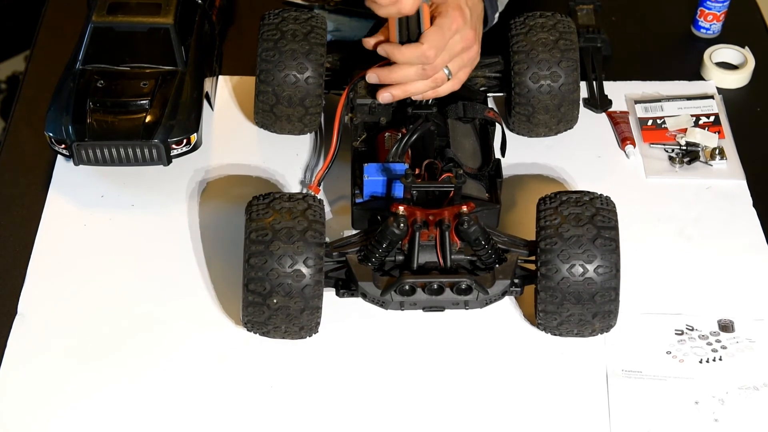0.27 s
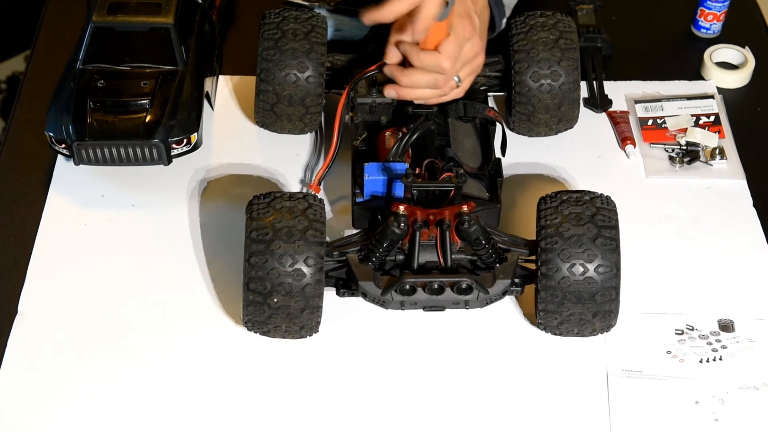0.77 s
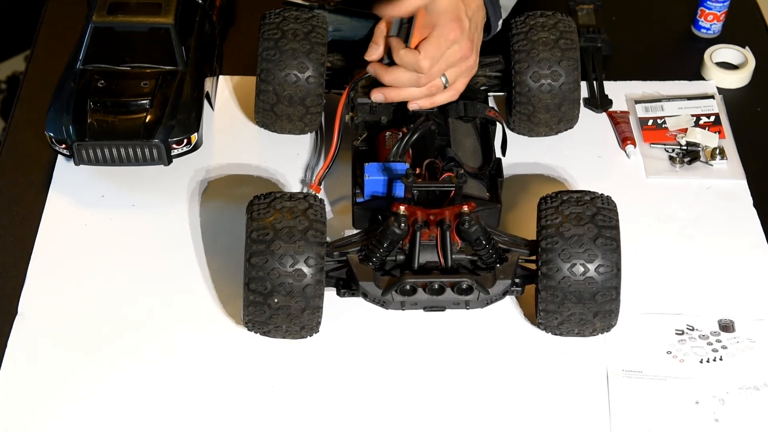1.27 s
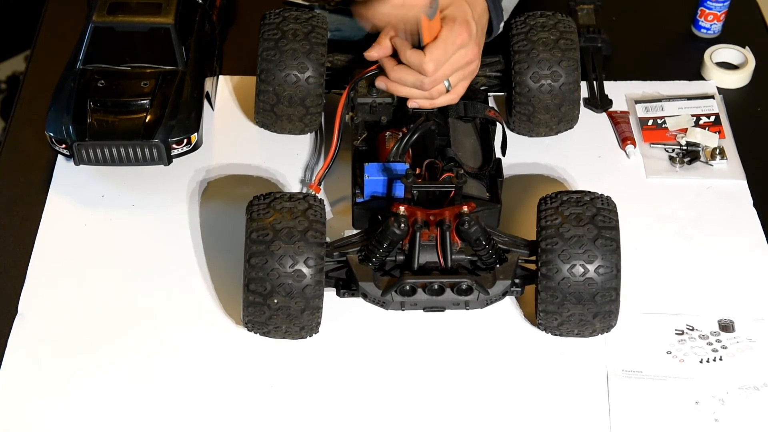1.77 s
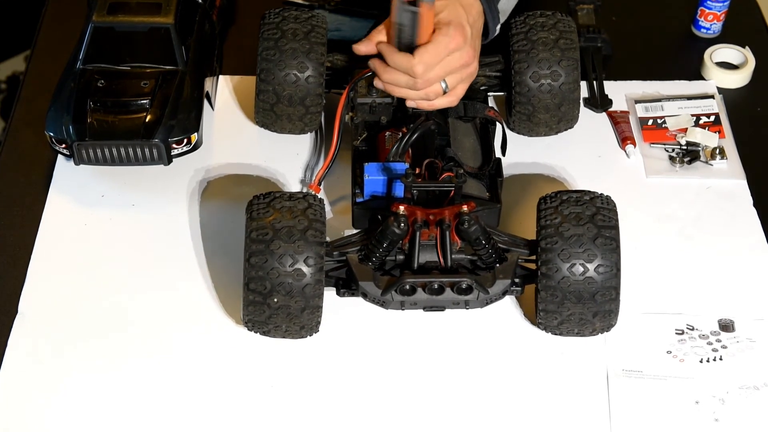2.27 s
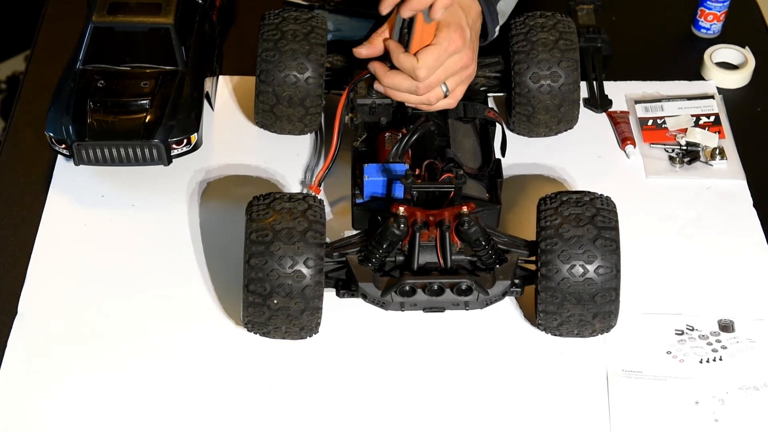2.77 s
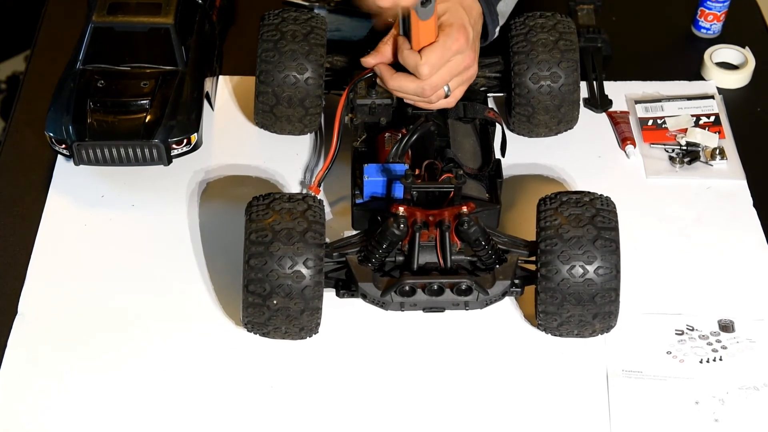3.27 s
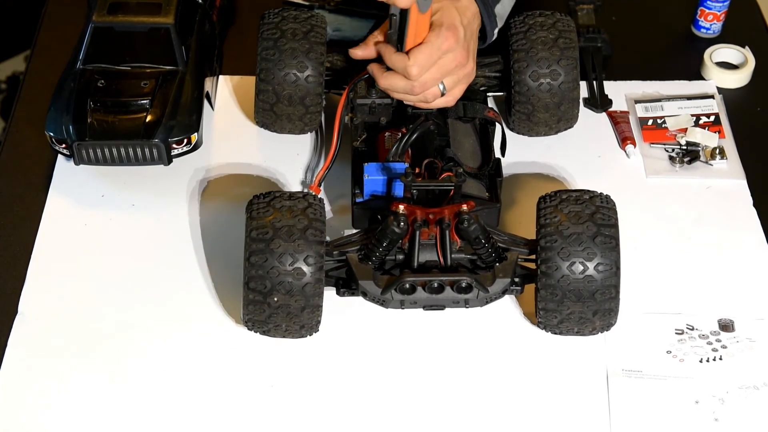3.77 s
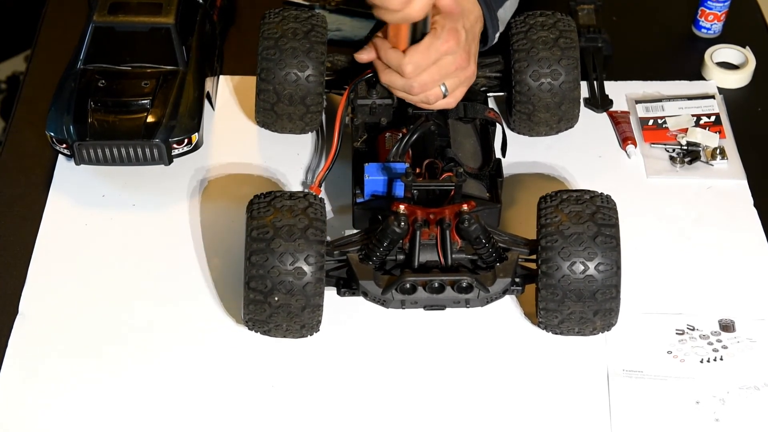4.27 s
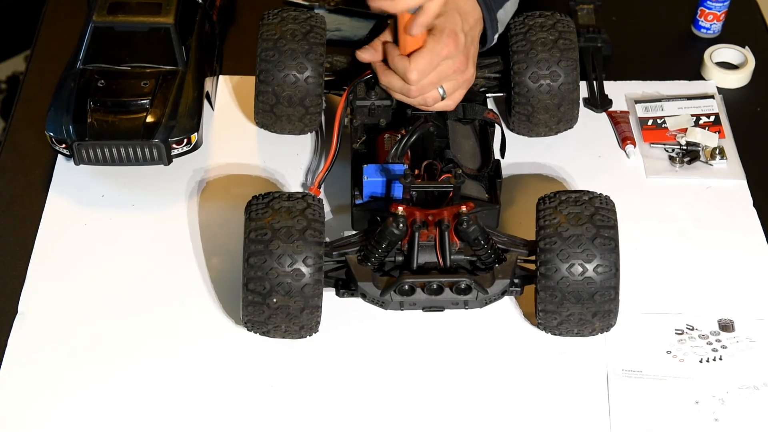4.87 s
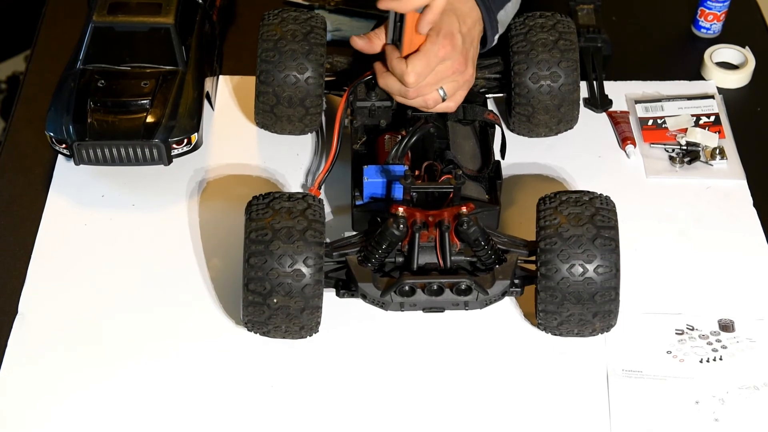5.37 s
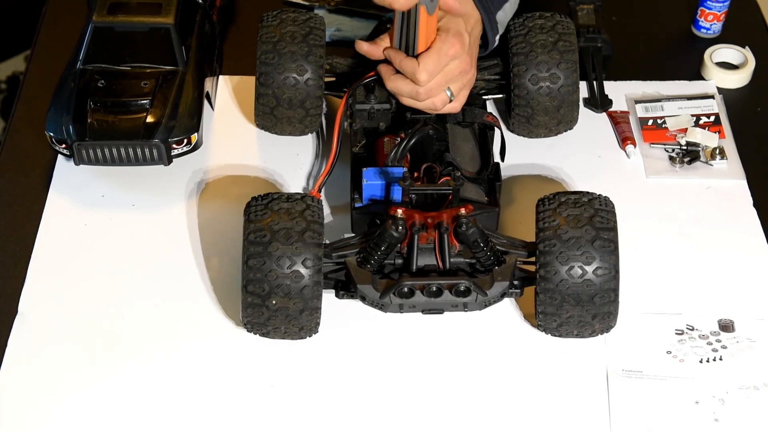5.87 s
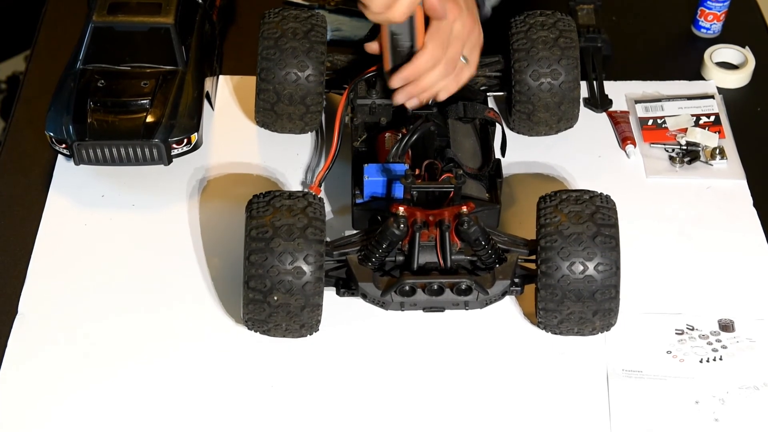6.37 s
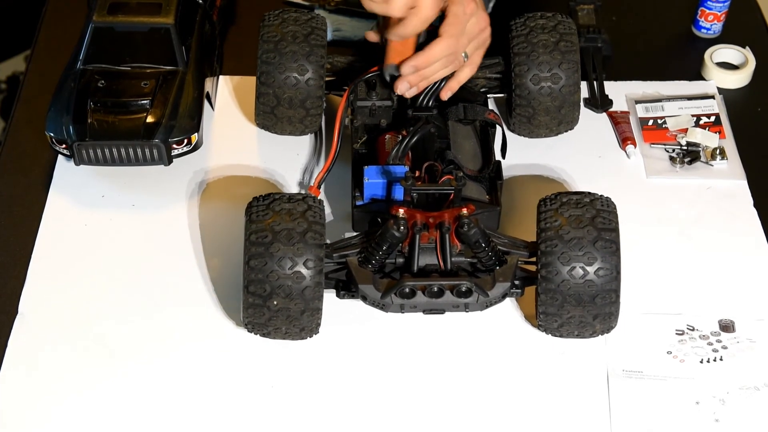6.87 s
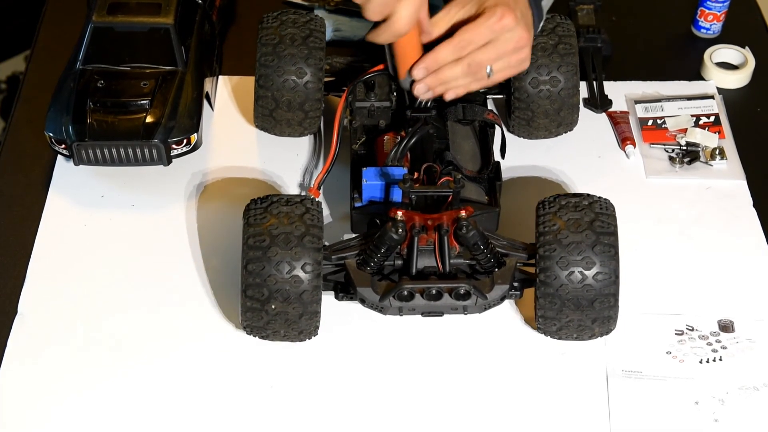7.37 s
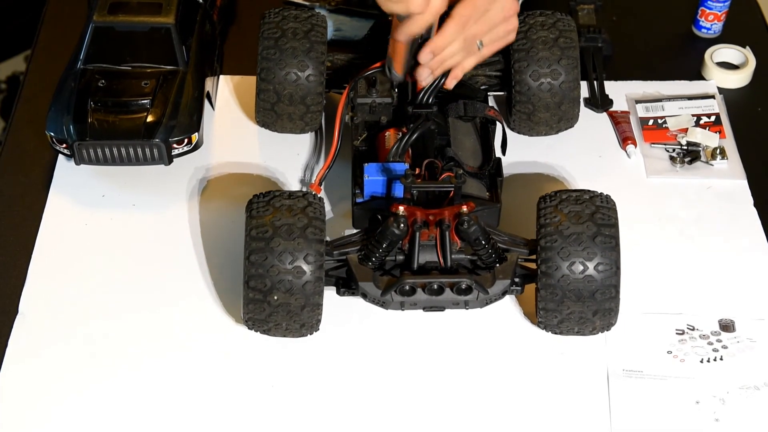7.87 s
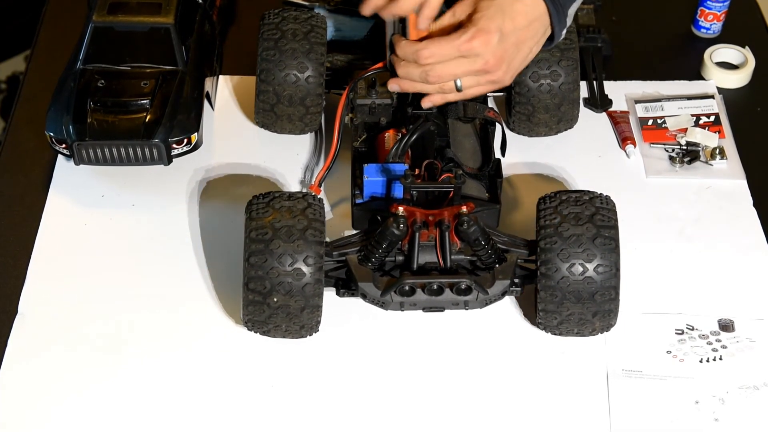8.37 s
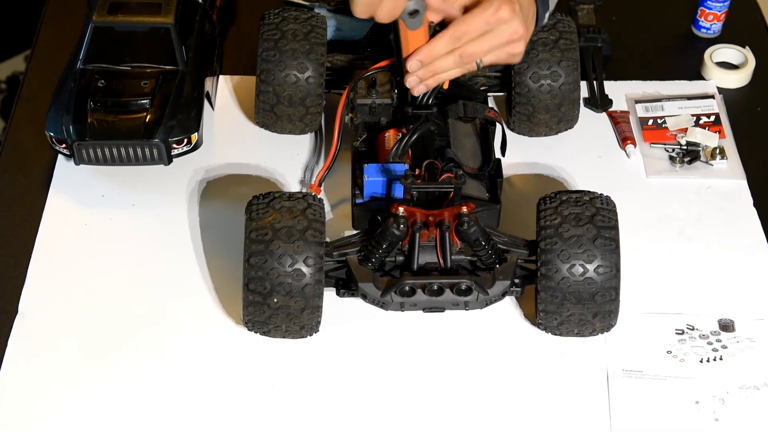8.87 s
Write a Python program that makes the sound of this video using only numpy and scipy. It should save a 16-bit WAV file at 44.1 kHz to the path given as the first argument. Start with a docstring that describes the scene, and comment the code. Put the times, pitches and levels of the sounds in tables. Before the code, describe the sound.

Close, dry snaps of a small tool against a hollow plastic chassis, with faint finger rubs and tiny creaks over soft room hiss.

```python
"""A quiet room, close to a table: hands turn a small tool in the plastic chassis of a model car.
Each blow makes the tool click and the chassis knock hollowly, by ringing damped resonances.
Fingers rub over the grip as coloured friction noise; tight parts creak as slips feed a narrow resonance.
Table and walls answer as early echoes and a diffuse tail, over room tone and faint microphone hiss.
A short low thump, one decaying push, lies under the snap at 7.2 s; a limiter holds the hardest snaps."""
import sys
import numpy as np
from scipy import signal
from scipy.fft import rfft, irfft, next_fast_len
from scipy.io import wavfile
from scipy.ndimage import uniform_filter1d, minimum_filter1d

SR = 44100
rng = np.random.default_rng(int(sys.argv[2]) if len(sys.argv) > 2 else 0)


def store_wav(level_fs):
    """Save 16-bit WAV to argv[1]."""
    pcm = np.round(np.clip(np.atleast_2d(level_fs), -1, 1) * 32767)
    wavfile.write(sys.argv[1], SR, pcm.T.astype(np.int16))


N = 402633

# strokes of the fingers over the grip: [middle t/s, half length/s, level/dB before the rub mix]
STROKES = [(0, 0.034, -56.5), (0.226, 0.032, -43), (0.523, 0.12, -54.5), (1.039, 0.035, -48),
           (1.579, 0.054, -53), (2.137, 0.025, -51), (2.284, 0.031, -49), (2.953, 0.051, -50.5),
           (3.116, 0.042, -49), (3.658, 0.059, -48), (4.195, 0.078, -52), (4.41, 0.045, -54.5),
           (4.625, 0.041, -51), (4.788, 0.044, -56), (5.086, 0.069, -48), (5.53, 0.067, -56),
           (5.731, 0.063, -53), (6.019, 0.017, -46), (6.326, 0.12, -56.5), (7.098, 0.098, -57),
           (7.588, 0.042, -54), (7.82, 0.077, -56.5), (8.539, 0.038, -53), (8.742, 0.049, -55)]
# resonances of the tool, the main one first: [f/Hz, width/Hz of one filter pass, relative level/dB]
TOOL_MODES = [(3466, 965, 11.5), (2646, 110, -5.5), (4174, 520, -5)]


def undb(db):
    """Decibels to gain."""
    return 10 ** (np.asarray(db) / 20)


def unit(x):
    """Scale to rms 1."""
    return x / np.sqrt(np.mean(x ** 2))


def along(points, hz):
    """Read (Hz, value) points on a log-frequency axis."""
    f, value = np.transpose(points)
    return np.interp(np.log(np.maximum(hz, 1)), np.log(f), value)


def colour(x, points):
    """Filter by a (Hz, dB) spectrum."""
    size = next_fast_len(len(x))
    gain = undb(along(points, np.fft.rfftfreq(size, 1 / SR)))
    return irfft(rfft(x, size) * gain, size)[:len(x)]


def add(track, s, sound):
    """Mix a sound into the track at time s."""
    i = max(int(s * SR), 0)
    part = sound[:max(len(track) - i, 0)]
    track[i:i + len(part)] += part


def stereo(mid, side):
    """Left and right from mid and side."""
    return np.array([mid + side, mid - side])


def quiet(db=-57.0):
    """Steady room tone and microphone hiss: coloured noise, narrow in the bass and wide in the treble."""
    # spectrum of room tone and hiss: [f/Hz, relative level/dB per Hz]
    tone_points = [(20, 3), (45, -7), (80, -2), (130, 1.5), (300, 2), (550, -.5), (1000, -5), (2000, -8),
                   (3500, -7.5), (5000, -10), (8000, -12), (12000, -12.5)]
    # stereo width: [f/Hz, side minus mid level/dB]
    width_points = [(25, -21), (70, -6.5), (150, -4.5), (400, -3), (1500, -1.5), (8000, -1), (16000, 0.5)]
    mid = unit(colour(rng.standard_normal(N), tone_points))
    side = unit(colour(rng.standard_normal(N), tone_points))
    return undb(db) * stereo(mid, colour(side, width_points))


def room(push, t60, tail_db, side_db, build_s=0.001464, size=14000):
    """A short push as it arrives: direct, off near surfaces, then as a diffuse tail that builds and decays."""
    # first reflections from table and walls: [delay t/s, level/dB re direct]
    reflections = [(.0019, -19.5), (.0046, -10.5), (.0071, -10.5), (0.0101, -14), (0.0152, -17)]
    t = np.arange(size) / SR
    fade = undb(-60 * t / t60) * (1 - np.exp(-(t / build_s) ** 2))
    tail = undb(tail_db) * rng.standard_normal((2, size)) * fade / np.linalg.norm(fade)
    mid, side = tail
    early = np.zeros(size)
    add(early, 0, push)
    for delay_s, db in reflections:
        moved = rng.uniform(.92, 1.08)  # the paths shift as the hands move
        add(early, delay_s * moved, undb(db) * push)
    return stereo(early + mid, undb(side_db) * side)


def contact(chatter_db, settle_s, size=2048):
    """One sharp blow, then tiny uneven contacts as the parts settle; energy 1."""
    t = np.arange(size) / SR
    chatter = unit(rng.standard_normal(size) ** 3)  # cubing makes it uneven
    push = undb(chatter_db) * chatter * np.exp(-t / settle_s)
    push[0] += 1
    return push / np.linalg.norm(push)


def ring(push, modes, main_hz=None, others_db=0):
    """A push through heavily damped resonances that swell, then decay; rms 1 over the first 4 ms."""
    shift = main_hz / modes[0][0] if main_hz else 1
    out = 0
    for k, (hz, width_hz, db) in enumerate(modes):
        hz = hz * shift
        b, a = signal.iirpeak(hz, hz / min(width_hz, SR / 5), fs=SR)  # width capped at SR / 5
        mode = signal.sosfilt([np.r_[b, a]] * 2, push)  # two passes give the swell
        out = out + undb(db + others_db * (k > 0)) * mode
    return out / np.sqrt(np.mean(out[:, :int(.004 * SR)] ** 2))


def thump(s=7.2065, db=-24, decay_s=0.00051, size=1024):
    """A short dull low thump under the snap at 7.2 s: one push that decays exponentially."""
    out = np.zeros(N)
    add(out, s, undb(db) * np.exp(-np.arange(size) / SR / decay_s))
    return out


def friction(grains_per_s, spread_db, catch_db, catch_s):
    """Countless tiny catches of uneven size over a smooth hiss; the finger sticks and slips in short spurts."""
    sizes = undb(spread_db * np.minimum(rng.exponential(size=N), 3))
    sizes = sizes * rng.choice([-1, 1], N)
    caught = rng.random(N) < grains_per_s / SR
    grains = unit(sizes * caught) + rng.standard_normal(N)
    spurts = unit(uniform_filter1d(rng.standard_normal(N), int(catch_s * SR)))
    return grains * undb(catch_db * spurts)


def rubs(rub_db=-2, skin_db=-14.5, shuffle_db=-66):
    """Each finger stroke swells and fades as scraping and skin hiss; between strokes the hands still shuffle."""
    # spectrum of the scraping: [f/Hz, relative level/dB per Hz]
    scrape_points = [(300, -21), (800, -12), (1450, -6.5), (2200, -9.5), (2800, -6.5), (3500, -1.5),
                     (4300, -8), (5200, -13.5), (7200, -18), (9500, -28), (16000, -46.5)]
    # spectrum of the skin's hiss: [f/Hz, relative level/dB per Hz]
    skin_points = [(500, -17), (1500, -4), (5000, -8.5), (7500, -0.5), (10000, -4.5), (14000, -7)]
    t = np.arange(N) / SR
    grip = np.full(N, undb(shuffle_db))
    for s, half_s, db in STROKES:
        grip += undb(db) * np.exp(-.5 * ((t - s) / half_s) ** 2)
    scrape = friction(grains_per_s=1800, spread_db=4.5, catch_db=3.5, catch_s=.008)
    scrape = undb(rub_db) * unit(colour(scrape, scrape_points))
    skin = undb(skin_db) * unit(colour(rng.standard_normal(N), skin_points))
    return grip * (scrape + skin)


def creaks(slip_s=0.0063, swell_s=0.00078, size=12000):
    """Tight parts creak: a short run of slips feeds one narrow resonance."""
    # creaks: [t/s, f/Hz, rms level/dB over the first 20 ms before the room, t60/s]
    creak_rows = [(1.718, 1000, -53, 0.018), (2.3, 1810, -46.5, .015), (5.1, 1148, -40.5, 0.046),
                  (5.234, 3000, -47, 0.062), (5.607, 1170, -50, 0.037)]
    out, t = np.zeros(N), np.arange(size) / SR
    for s, hz, db, t60 in creak_rows:
        mode = np.sin(2 * np.pi * hz * t) * undb(-60 * t / t60) * (1 - np.exp(-t / swell_s))
        slips = contact(chatter_db=-12.0, settle_s=slip_s)
        tone = signal.fftconvolve(slips, mode)[:size]
        add(out, s, undb(db) * tone / np.sqrt(np.mean(tone[:SR // 50] ** 2)))
    return out


def stray_clicks(odds_per_s=6.2, over_rub_db=2.5, spread_db=1.5, upper_re_rub_db=-7.5):
    """Loose parts tick faintly, at most once a stroke and likelier in long ones; rows like those of the clicks."""
    rows = []
    draws = rng.uniform(-1.1, 1, (len(STROKES), 4))
    for (s, half_s, rub_db), (chance, when, tool, chassis) in zip(STROKES, draws):
        if abs(chance) < odds_per_s * 2 * half_s:
            db = rub_db + over_rub_db
            rows.append((s + when * half_s, TOOL_MODES[0][0], db + spread_db * tool,
                         db + spread_db * chassis, db + upper_re_rub_db))
    return rows


def touch(tool_db, chassis_db, upper_db):
    """Pitch of the chassis and level of the tick, from how hard and where the blow lands."""
    hollowness_db = chassis_db - tool_db
    snap_db = max(tool_db + 13, 0)  # a hard snap is one above -13 dB
    # a knock that goes mostly into the chassis sounds deeper: 31 Hz per dB beyond 3 dB
    chassis_hz = 1540 - 31 * max(hollowness_db - 3, 0)
    # the tick follows the upper ring; a glancing touch has less of it, a hard snap more
    tick_db = upper_db - 3.5 + 0.75 * min(hollowness_db, 0) + .45 * snap_db
    return chassis_hz, tick_db


def clicks(give_hz=6000):
    """Every blow rings tool and chassis, pitched by how they are gripped, with an upper ring and a bare tick."""
    # clicks of the tool on the chassis, rms levels over the first 4 ms:
    # [t/s, tool f/Hz, tool level/dB, chassis level/dB, upper ring level/dB]
    click_rows = [(0.2011, 3640, -36.5, -40, -44), (0.2195, 3430, -14, -36, -38),
                  (0.2298, 3490, -18.5, -23, -38.5), (.441, 3260, -31.5, -41.5, -72),
                  (.534, 3480, -33, -39, -63), (0.546, 3450, -47.5, -42.5, -55),
                  (.8369, 3250, -41.5, -45.5, -61), (1.0522, 4180, -34.5, -36, -40.5),
                  (1.3378, 3520, -15.5, -19.5, -29.5), (1.577, 4460, -49.5, -42, -46.5),
                  (1.629, 3460, -26, -43, -43.5), (1.7572, 3800, -44, -44.5, -52),
                  (1.8224, 3350, -47.5, -48, -60), (1.9173, 3390, -10, -37, -28.5),
                  (2.3025, 3830, -41, -43.5, -51), (2.6442, 3300, -39, -52, -63),
                  (2.7153, 3600, -44.5, -43, -55.5), (3.159, 4470, -37, -45, -47.5),
                  (3.4721, 3470, -17.5, -40.5, -34.5), (3.633, 3980, -25.5, -39, -42.5),
                  (3.7448, 3130, -43, -45, -72), (3.8671, 3400, -43.5, -45, -61),
                  (4.2394, 3660, -40.5, -37, -48), (4.313, 3570, -44.5, -38.5, -50),
                  (4.3641, 3530, -19.5, -44, -39.5), (4.408, 3440, -32, -52, -61),
                  (4.4284, 3590, -38, -36, -51), (4.5823, 3250, -50.5, -42, -65),
                  (4.6944, 3550, -45, -41, -61), (4.7656, 3780, -37.5, -42, -42),
                  (4.8882, 3660, -43, -43, -63), (5.0147, 3760, -27, -41, -46),
                  (5.102, 3580, -55.5, -39, -54), (5.2319, 3600, -35, -44.5, -42.5),
                  (5.439, 3430, -45.5, -33.5, -53), (5.6076, 3700, -55, -46, -54),
                  (5.7077, 3380, -53, -42, -59), (5.953, 3340, -44, -45, -55),
                  (6.0317, 3700, -41.5, -44.5, -46.5), (6.1265, 3480, -46.5, -51.5, -53),
                  (6.6145, 3900, -41.5, -37, -50), (6.9121, 3520, -46, -46, -53),
                  (6.9874, 3600, -45, -46, -58), (7.0976, 3660, -48.5, -45, -62),
                  (7.1818, 3810, -34, -47, -53), (7.1981, 3500, -15.5, -39, -42),
                  (7.2059, 3220, -10.5, -25, -23), (7.2123, 3360, -6, -18.5, -25.5),
                  (7.2185, 3430, -16.5, -30, -26), (7.5416, 3530, -40.5, -38, -46.5),
                  (7.588, 3540, -31.5, -41, -55), (7.6554, 3600, -24.5, -38.5, -40.5),
                  (7.9125, 3430, -40, -30.5, -56), (7.9265, 3770, -34, -34.5, -45),
                  (8.0755, 3440, -14, -24.5, -35), (8.0829, 3150, -7.5, -23, -23.5),
                  (8.0933, 3410, -11.5, -18, -23), (8.5604, 3920, -44.5, -44, -45),
                  (8.9434, 3580, -45.5, -42, -54.5), (9.072, 3450, -39.5, -47.5, -68)]
    # resonances, the main one first: [f/Hz, width/Hz of one filter pass, relative level/dB]
    chassis_modes = [(1465, 810, 12), (1033, 280, -6), (2105, 210, 6.5), (403, 1000, -22.5)]  # the plastic chassis
    upper_modes = [(6820, 1500, 0.5), (5940, 2500, 3)]  # upper resonances of the tool
    tick_modes = [(10400, 5000, -5.5), (13700, 14000, 2)]  # the bare contact
    out = np.zeros((2, N))
    give = signal.butter(2, give_hz, fs=SR, output="sos")  # plastic yields and rounds the blow
    for s, tool_hz, tool_db, chassis_db, upper_db in click_rows + stray_clicks():
        chassis_hz, tick_db = touch(tool_db, chassis_db, upper_db)
        # a light touch chatters more and wakes little but the main resonances
        light = np.clip(-chassis_db / 40, 0, 1)
        tool = room(contact(chatter_db=-26 + 7.2 * light, settle_s=0.0033),
                    t60=0.3, tail_db=-5.5, side_db=-7.5)
        chassis = room(contact(chatter_db=-21.5, settle_s=0.00365), t60=0.32, tail_db=-6.0, side_db=-5.5)
        upper = room(contact(chatter_db=-11, settle_s=0.0068), t60=0.3, tail_db=-2, side_db=-7.5)
        # the tick's treble dies sooner in the room and arrives from all sides
        tick = room(contact(chatter_db=-26, settle_s=0.0052), t60=0.11, tail_db=0.5, side_db=0)
        rounded = signal.sosfilt(give, tool)
        sound = undb(tool_db) * ring(rounded, TOOL_MODES, tool_hz, others_db=17 * (1 - light))
        sound += undb(chassis_db) * ring(chassis, chassis_modes, chassis_hz, others_db=12.5 - 16 * light)
        sound += undb(upper_db) * ring(upper, upper_modes)
        sound += undb(tick_db) * ring(tick, tick_modes)
        for track, part in zip(out, sound):
            add(track, s, part)
    return out


def scene():
    """The handling, straight ahead of the microphone, in the room."""
    walls = room(np.ones(1), t60=0.28, tail_db=-2.5, side_db=-9.5)
    handling = creaks() + rubs()
    sliding = signal.fftconvolve(handling[None], walls, axes=1)[:, :N]
    return quiet() + thump() + sliding + clicks()


def record(dry, hold_s=0.00074, top_hz=15900):
    """A fast limiter holds the hardest snaps to full scale; then a steep low-pass cuts the top."""
    hold = int(hold_s * SR)
    peak = np.abs(dry).max(axis=0)
    gain = minimum_filter1d(1 / np.maximum(peak, 1), 2 * hold + 1)
    limited = dry * uniform_filter1d(gain, hold)
    top_cut = signal.ellip(12, .1, 90, top_hz, fs=SR, output="sos")
    return signal.sosfilt(top_cut, limited)


dry = scene()
out = record(dry)
store_wav(out)
```